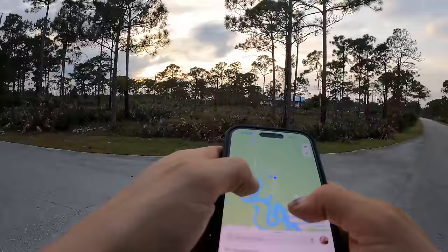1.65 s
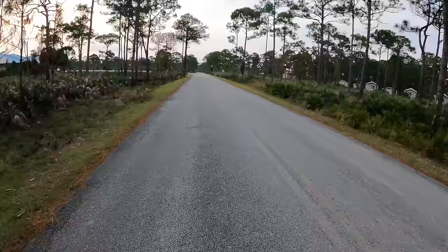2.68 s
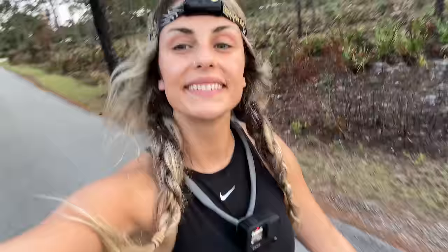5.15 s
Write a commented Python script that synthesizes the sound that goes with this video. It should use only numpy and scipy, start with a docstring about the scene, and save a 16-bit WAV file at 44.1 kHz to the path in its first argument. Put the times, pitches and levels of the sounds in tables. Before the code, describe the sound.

A gritty rumble of inline skate wheels on an outdoor road comes with bursts of rattling and low gusts on the skater's own microphone. After a short, quieter glide, the wheels hit coarser pavement, scraping sideways and striking cracks as the boots thump and boom. Finally the other skate takes the weight with a hollower chatter, and a thin, bright hiss swells.

```python
"""Inline skates roll down rough asphalt, heard from a microphone that the skater carries.
From the start, stones drum on the wheels and boom in the boots, wind buffets the microphone, and the
wheels chatter and clack in their frames. Near 2 s the rolling drops away; it returns on coarser road,
where the wheels scrape sideways and strike cracks and the boots thump and boom under load.
Just after 5 s the other, hollower skate takes the weight, and a bright hiss opens and grows."""
import sys
import numpy as np
from scipy.fft import rfft, irfft, next_fast_len
from scipy.io import wavfile
from scipy.ndimage import map_coordinates

SR = 44100
rng = np.random.default_rng(int(sys.argv[2]) if len(sys.argv) > 2 else 0)


def generate_wav(sig):
    """Save sig (samples, or channels by samples) to the path in sys.argv[1] as 16-bit PCM at SR."""
    pcm = np.round(np.clip(np.atleast_2d(sig).T, -1, 1) * 32767).astype(np.int16)
    wavfile.write(sys.argv[1], SR, pcm)


N = 251811


def amp(db):
    """Decibels to gain."""
    return 10 ** (np.asarray(db) / 20)


def unit(x):
    """Scale to rms 1."""
    return x / np.sqrt(np.mean(x ** 2) + 1e-20)


def along(points, hz):
    """(Hz, value) points read on a log axis."""
    f, v = np.transpose(points)
    return np.interp(np.log(hz + 1), np.log(f + 1), v)


def curves(rows):
    """One value per sample for each column after the time."""
    s, *cols = np.transpose(rows)
    return [np.interp(np.arange(N) / SR, s, c) for c in cols]


def wobble(rate):
    """A smooth random curve, rate knots a second."""
    return map_coordinates(rng.standard_normal(int(N * rate / SR) + 4), [np.arange(N) * rate / SR])


def filtered(x, response):
    """x times a response of frequency."""
    m = next_fast_len(N + SR // 2)
    return irfft(rfft(x, m) * response(np.fft.rfftfreq(m, 1 / SR)), m)[..., :N]


def stereo(pair, spectrum, alike):
    """Two unrelated signals become a coloured left and right of rms 1."""
    turn = lambda hz: np.arccos(np.clip(along(alike, hz), -1, 1)) / 2
    mid, side = filtered(pair, lambda hz: amp(along(spectrum, hz)) * [np.cos(turn(hz)), np.sin(turn(hz))])
    return unit(np.array([mid + side, mid - side]))


def stones(rate, spread_db, smooth):
    """Shot noise: tiny impacts of uneven size, rate a second, on a bed of smooth noise."""
    hit = rng.random(N) < rate / SR
    size = amp(spread_db * rng.standard_normal(N))
    return unit(hit * size * rng.standard_normal((2, N))) + smooth * rng.standard_normal((2, N))


def place(times, sounds):
    """Superposition: sum stereo sounds (2, events, samples) at their times."""
    index = np.round(np.abs(times) * SR).astype(int)[:, None] + np.arange(sounds.shape[-1])
    return np.array([np.bincount(index.ravel(), side.ravel(), N)[:N] for side in sounds])


def swell(peak_s, rise_s, fall_s):
    """A Gaussian envelope of height 1, with separate widths for rise and fall."""
    t = np.arange(N) / SR - peak_s
    return np.exp(-(t / np.where(t < 0, rise_s, fall_s)) ** 2)


# stretches of road and load: (start [s], roar level [dB], boot level [dB], grit level [dB])
ROAD_STRETCHES = [(0, -46, -46, -69.5), (1.42, -47, -48, -64), (1.65, -53.5, -53, -69),
                  (1.97, -59, -53, -77.5), (2.71, -45.5, -39.5, -64.5), (4.235, -43.5, -36.5, -59.5),
                  (5.178, -46, -36.5, -64)]
# the skater pushes off: (time [s], roar gain [dB], boot gain [dB])
PUSH_OFFS = [(.76, 1, 2), (2.56, 2.5, 2), (3.1, 3, 1.5), (3.82, 5.5, 0.5), (4.33, 2, 2.5), (4.95, -1, -1),
             (5.66, 3.5, 1)]

def rolling_db():
    """Exponential relaxation: roar, boot and grit levels settle to each stretch; pushes swell them."""
    bite_s, ease_s = .008, .03  # the roar rises faster than it falls
    t = np.arange(N) / SR
    rows = np.array(ROAD_STRETCHES)
    levels = rows[0, 1:, None] + np.zeros(N)
    for start, step in zip(rows[1:, 0], np.diff(rows[:, 1:], axis=0)):
        settle_s = bite_s if step[0] > 0 else ease_s
        levels += np.outer(step, 1 - np.exp(-np.maximum(t - start, 0) / settle_s))
    for s, roar_db, boot_db in PUSH_OFFS:
        levels += np.outer([roar_db, boot_db, 1.2 * roar_db], swell(s, rise_s=.16, fall_s=.22))
    return levels


# spectra of dull road, coarse road, boot and grit: (frequency [Hz], level [dB])
DULL_SPECTRUM = [(70, -19), (100, 4.5), (170, -1), (400, -1), (730, -2), (860, -6), (1300, -9.5),
                 (1700, -17.5), (2100, -23), (3300, -28), (7000, -120)]
COARSE_SPECTRUM = [(70, -63), (160, -20), (280, 1.5), (500, -4.5), (700, -4), (1150, -6.5), (1450, -12.5),
                   (1780, -16.5), (2600, -25), (3400, -34), (7000, -120)]
BOOT_SPECTRUM = [(25, -72), (70, -11.5), (110, -0.5), (160, 1.5), (235, -3), (380, -17.5), (500, -32),
                 (900, -120)]
GRIT_SPECTRUM = [(500, -63), (1600, -3), (2700, -3), (4200, -4.5), (4750, -9.5), (5700, -10), (6400, -15.5),
                 (7000, -11), (8200, -20), (9200, -25), (12300, -22), (13400, -42), (15000, -100)]
# left-right likeness of the skates' noise: (frequency [Hz], coherence [0-1])
COHERENCE = [(30, 1), (300, 0.91), (1500, 0.87), (5000, 1), (9000, 0.35)]

def rolling():
    """Roughness excitation: stones drum on the wheels; rough patches lift roar and grit together."""
    roar_db, boot_db, grit_db = rolling_db()
    patches = wobble(55) + wobble(14)
    drumming = stones(rate=1800, spread_db=1, smooth=1)
    on_coarse = np.arange(N) / SR > 2.715
    dull = stereo(drumming, DULL_SPECTRUM, COHERENCE)
    coarse = stereo(drumming, COARSE_SPECTRUM, COHERENCE)
    roar = amp(roar_db + .95 * patches) * np.where(on_coarse, coarse, dull)
    boot_gain = amp(boot_db + 1.15 * wobble(25))
    boot = stereo(stones(rate=700, spread_db=1.5, smooth=.58), BOOT_SPECTRUM, COHERENCE)
    grit = stereo(stones(rate=1400, spread_db=-1.5, smooth=.8), GRIT_SPECTRUM, COHERENCE)
    return roar + boot_gain * boot + amp(grit_db + 1.54 * patches) * grit


def surges(rows, waver):
    """Amplitude and frequency modulation: low tones swell and die while their pitch wanders."""
    total = np.zeros(N)
    for s, db, width, hz in rows:
        cycles = rng.random() + np.cumsum(hz * np.exp(waver * wobble(45))) / SR
        total += amp(db) * swell(s, width, width) * np.sin(2 * np.pi * cycles)
    return np.sqrt(2) * total


# wind pressure on the microphone: (frequency [Hz], level [dB])
WIND_SPECTRUM = [(13, -30), (24, 4.5), (35, 5), (55, 2), (90, 1.5), (130, -31), (200, -35.5), (400, -120)]
# gusts: (time [s], level [dB], half-width [s], frequency [Hz])
WIND_GUSTS = [(1.6, -38, 0.096, 72), (1.75, -35, 0.11, 36), (2.17, -37, 0.07, 34), (2.46, -34.5, 0.11, 27),
              (4.31, -34.5, 0.041, 27.8), (4.39, -40, 0.083, 42), (4.99, -33, 0.079, 35)]

def wind():
    """Turbulent pressure: a few gusts ride on a breeze that loses its deepest part near the end."""
    light_from_s, cutoff_hz = 5.28, 52
    air = stereo(rng.standard_normal((2, N)), WIND_SPECTRUM, alike=[(30, .91)])
    light_air = unit(filtered(air, lambda hz: 1 / (1 + (cutoff_hz / (hz + 1)) ** 6)))
    blend, = curves([(light_from_s - .1, 0), (light_from_s, 1)])
    breeze = (1 - blend) * amp(-41) * air + blend * amp(-40.5) * light_air
    return breeze + surges(WIND_GUSTS, waver=.202)


def ring(modes, count, detune, scatter_db):
    """Damped modes: each blow excites them differently, and the soft tyre rounds the attack."""
    energy_s = .0025  # each ring has the energy of rms 1 held this long
    t = np.arange(SR // 40) / SR
    hz, db, t60 = np.transpose(modes)
    pitch, size, skew = rng.standard_normal((count, 3, len(modes), 1)).transpose(1, 0, 2, 3)
    attack = 1 - np.exp(-(t / .0008) ** 2)
    envelope = amp(db[:, None] + scatter_db * size - 60 * t / t60[:, None]) * attack
    phase = 2 * np.pi * hz[:, None] * (1 + detune * pitch) * t + rng.uniform(0, 2 * np.pi, (count, 1, 1))
    rings = np.array([(envelope * np.sin(phase + side * .15 * skew)).sum(1) for side in (1, -1)])
    return rings / np.sqrt((rings ** 2).sum(-1, keepdims=True).mean(0) / (energy_s * SR))


def load(s):
    """Contact load at times s, taken to follow the roar: 1 rolling hard, small in a light glide."""
    full_load_db = -47
    roar_db = np.interp(s * SR, np.arange(N), rolling_db()[0])
    return np.minimum(amp(roar_db - full_load_db), 1)[:, None]


# modes of each skate's wheel and frame, and of the first skate's frame body and axle under load: (frequency
# [Hz], level [dB], T60 [s])
FIRST_FRAME_MODES = [(1530, -2, .014), (1730, 0, .017), (2230, -6.5, .015), (3200, -13.5, .014)]
OTHER_FRAME_MODES = [(1100, -3.5, .009), (1520, 0, .013), (2380, -6.5, .012), (2850, -8.5, .012),
                     (3450, -11, .013)]
LOADED_MODES = [(1200, -5.5, .009), (2650, -11, .011), (4150, -22, .007), (5700, -16, .007)]

def knocks(s):
    """Modal ringing of the skate that bears the weight; under load the first one's frame body and axle ring
    too."""
    other_skate_s = 5.2
    first = ring(FIRST_FRAME_MODES, count=len(s), detune=.035, scatter_db=1.5)
    other = ring(OTHER_FRAME_MODES, count=len(s), detune=.035, scatter_db=1.5)
    loaded = amp(-9) * load(s) * ring(LOADED_MODES, count=len(s), detune=.05, scatter_db=3)
    return np.where((s > other_skate_s)[:, None], other, first + loaded)


# bouts of chatter: (start [s], end [s], wheel period [s], final level [dB])
CHATTER_BOUTS = [(.39, .85, .103, -52.5), (.98, 1.65, .111, -50.5), (3.098, 3.78, .085, -45.3),
                 (5.25, 5.71, .088, -45.5)]

def chatter_level():
    """Modulation by rotation: each bout builds above a faint idle chatter, dipping once a turn."""
    edge_s, growth_db_per_s, dip_db = .015, 2.5, 14
    t = np.arange(N) / SR
    level = amp(rolling_db()[0] - 12.5)  # idle chatter follows the roar
    for start, end, turn_s, db in CHATTER_BOUTS:
        gate = np.clip(np.minimum(t - start, end - t) / edge_s, 0, 1)
        dip = np.cos(np.pi * (t - start) / turn_s) ** 6 * (1 + .25 * np.tanh(wobble(12)))
        bout_db = db - growth_db_per_s * np.abs(end - t) - dip_db * dip
        level = np.maximum(level, gate * amp(bout_db))
    return level


# wheels rasping over grit: (frequency [Hz], level [dB])
RASP_SPECTRUM = [(400, -98), (1100, 2.5), (1650, 6.5), (2000, -0.5), (2350, 2.5), (2950, -14), (3450, -6.5),
                 (4600, -14.5), (5750, -11.5), (7500, -28.5), (14000, -44)]

def chatter(count=900):
    """Impact and friction: the wheels rattle and rasp in a flurry as their worn side comes round."""
    s = (np.arange(count) + .7 * rng.random(count)) * N / SR / count
    size = amp(2.5 * np.clip(rng.standard_normal((count, 1)), -2, 1))
    rattle = unit(place(s, size * knocks(s)))
    slips = amp(8 * np.tanh(wobble(190)))
    rasp = unit(slips * stereo(rng.standard_normal((2, N)), RASP_SPECTRUM, COHERENCE))
    return chatter_level() * (amp(-4) * rattle + amp(-3.5) * rasp)


# the loudest wheel clacks: (time [s], relative level [dB], treble gain [dB])
WHEEL_CLACKS = [(0.1988, -44, 1), (0.3942, -43, -3), (0.408, -41, -4), (0.6347, -44, 2), (0.7034, -39, -6),
                (0.728, -44.5, 4), (0.804, -43, 3), (0.8184, -40.5, 0), (1.0999, -44, 1),
                (1.2602, -37.5, 1), (1.2829, -44, 3), (1.3545, -41.5, 4), (1.3707, -42.5, 2),
                (1.4585, -39, 1), (1.472, -40, 1), (1.4897, -36, 3), (1.5147, -39.5, 3), (1.5638, -36, -1),
                (1.5933, -32.5, 1), (1.6112, -38.5, -2), (1.6358, -39, 7), (1.692, -53, 7),
                (1.8462, -40.5, 1), (1.9994, -52, 10), (2.1406, -41.2, -1), (2.2013, -44, -1),
                (2.2338, -41.5, -1), (2.2514, -52.5, -1), (2.2914, -53, 3), (2.3323, -52.5, 7),
                (2.3726, -53.5, 5), (2.5972, -50, 4), (2.9377, -43, 9), (2.9479, -38.5, -8),
                (2.985, -40, -8), (3.1359, -38, 0), (3.165, -44, 5), (3.2101, -40.5, 1),
                (3.2405, -39.5, -2), (3.3018, -40, 0), (3.4451, -42, 4), (3.5699, -38.5, 3),
                (3.5883, -37.5, -3), (3.6304, -39.5, -4), (3.6463, -37.5, 1), (3.6749, -41, 7),
                (3.7174, -36, -6), (5.3005, -43, 7), (5.3704, -37, -7), (5.4572, -36, -3),
                (5.4675, -36.5, 0), (5.4773, -38, 2), (5.532, -39, -1), (5.5524, -37, 2), (5.6263, -35, 0)]
# their dry snap: (frequency [Hz], level [dB])
SNAP_SPECTRUM = [(400, -50), (1100, -7), (1600, 0), (2500, -3), (3400, -6), (4100, -27), (13000, -40),
                 (15000, -70)]

def clacks():
    """Impact excitation: a wheel hits its axle, rings the frame and, under load, snaps and rebounds."""
    snap_t60_s, crossover_hz = .014, 2000
    s, db, treble_db = np.transpose(WHEEL_CLACKS)
    rings = knocks(s)
    rebound_s = s + rng.uniform(.003, .006, len(s))
    rebounds = amp(-8.5) * load(s) * knocks(rebound_s)
    t = np.arange(rings.shape[-1]) / SR
    bursts = amp(-14 - 60 * t / snap_t60_s) * load(s) * rng.standard_normal(rings.shape)

    def strikes(level_db):
        size = amp(level_db - 2.4)[:, None]
        noise = place(s, size * bursts)
        snaps = np.std(noise) * stereo(noise, SNAP_SPECTRUM, COHERENCE)
        return snaps + place(s, size * rings) + place(rebound_s, size * rebounds)

    lowpass = lambda hz: 1 / (1 + (hz / crossover_hz) ** 16)
    body = filtered(strikes(db), lowpass)
    treble = filtered(strikes(db + treble_db), lambda hz: 1 - lowpass(hz))
    return body + treble


# sideways slides: (time [s], level [dB], half-width [s])
SLIDES = [(2.81, -60, 0.047), (3.04, -60, .12), (3.65, -64, 0.058), (3.78, -53.5, .07), (4.45, -58, .2),
          (4.82, -59, 0.16)]
# a sliding wheel: (frequency [Hz], level [dB])
SLIDE_SPECTRUM = [(700, -40), (1200, -2), (1500, -4), (1820, 5.5), (2150, -6), (3100, -14), (4350, -4.5),
                  (5200, -13), (7000, -35)]

def scrapes():
    """Sliding friction: a wheel slips sideways over the grit in short, grainy scrapes."""
    level = sum(amp(db) * swell(s, width, width) for s, db, width in SLIDES)
    slips = amp(2.5 * wobble(90))
    grains = stones(rate=900, spread_db=2, smooth=.7)
    return level * slips * stereo(grains, SLIDE_SPECTRUM, COHERENCE)


# wheels striking cracks: (time [s], relative level [dB])
CRACK_BLOWS = [(3.0415, -31), (4.2412, -20.5), (4.248, -30), (4.255, -30)]
# the thud of a blow: (frequency [Hz], level [dB])
THUD_SPECTRUM = [(40, -18), (110, 14.5), (230, 8.5), (450, 6.5), (1000, 0), (2700, -11.5), (5400, -21),
                 (7000, -41), (12500, -47), (15000, -90)]

def cracks(t60_s=.02):
    """Damped impacts: the wheels drop into cracks one after another with short, dull blows."""
    s, db = np.transpose(CRACK_BLOWS)
    t = np.arange(SR // 20) / SR
    envelopes = amp(db[:, None] - 60 * t / t60_s)
    blows = place(s, envelopes * rng.standard_normal((2, len(s), len(t))))
    return amp(-1.5) * np.std(blows) * stereo(blows, THUD_SPECTRUM, COHERENCE)


# a skate takes the weight: (time [s], peak level [dB])
LANDINGS = [(3.085, -34.5), (3.98, -26), (5.249, -29.5)]

def thumps(hz=68):
    """Damped oscillation: weight landing on a skate gives a low pulse with a soft onset."""
    s, db = np.transpose(LANDINGS)
    t = np.arange(SR // 10) / SR
    pulse = np.sin(2 * np.pi * hz * t) * t * amp(-60 * t / .093)
    return place(s, amp(db)[None, :, None] * pulse / np.abs(pulse).max())


# booms of the boot: (time [s], level [dB], half-width [s], frequency [Hz])
BOOT_BOOMS = [(3.86, -36.5, 0.034, 175.2), (3.92, -34.5, 0.036, 148), (4.27, -37, 0.033, 186),
              (4.95, -35.5, 0.038, 145.3)]

def booms():
    """Resonance: the loaded boot booms briefly at a nearly steady pitch."""
    return surges(BOOT_BOOMS, waver=.069)


# the closing hiss: (frequency [Hz], level [dB])
HISS_SPECTRUM = [(1500, -86), (4700, -6), (6200, 5), (7300, -7), (8500, -2.5), (10000, -7), (12000, -2),
                 (15500, -8)]

def hiss(start_s=5.178, growth_db_per_s=23.5):
    """Modulated noise: a bright, grainy hiss flutters as its amplitude grows exponentially."""
    grains = stones(rate=1900, spread_db=3.5, smooth=.9)
    noise = stereo(grains, HISS_SPECTRUM, alike=[(6000, .038), (12000, .94)])
    age = np.arange(N) / SR - start_s
    return (age > 0) * amp(-67.5 + growth_db_per_s * age + 2.8 * wobble(110)) * noise


# left port relative to right: (frequency [Hz], level difference [dB])
PORT_BALANCE = [(60, 3), (400, -0.3), (1200, 2), (4000, 2), (9000, 6)]
# left port relative to right: (frequency [Hz], phase lead [rad])
PORT_PHASE = [(100, -0.17), (400, -0.71), (900, -0.79), (1600, -0.59), (3000, -1), (8000, -0.16)]

def scene():
    """Superposition: wind, hiss and the skates, unequal in level and phase at two microphone ports."""
    skates = rolling() + chatter() + clacks() + scrapes() + cracks() + thumps() + booms()
    half = np.array([[.5], [-.5]])
    ports = lambda hz: amp(half * along(PORT_BALANCE, hz)) * np.exp(1j * half * along(PORT_PHASE, hz))
    return filtered(skates, ports) + wind() + hiss()


def record(dry):
    """Band limiting: nothing above 15750 Hz passes."""
    return filtered(dry, lambda hz: hz < 15750)


dry = scene()
out = record(dry)
generate_wav(out)
```